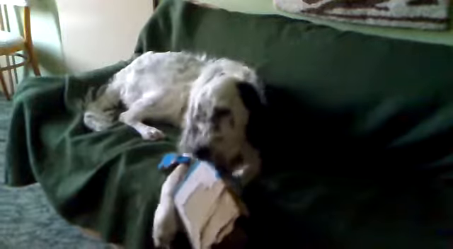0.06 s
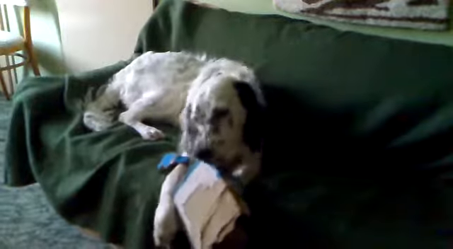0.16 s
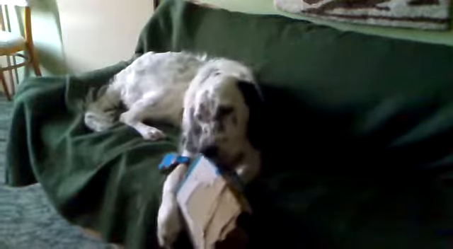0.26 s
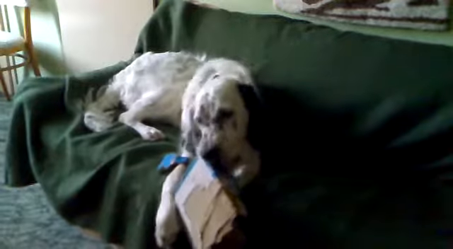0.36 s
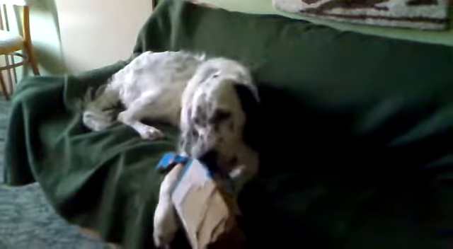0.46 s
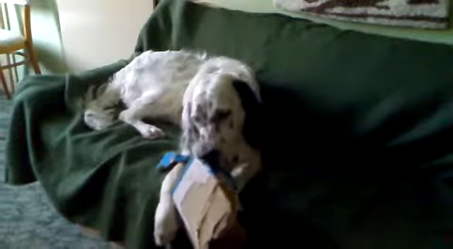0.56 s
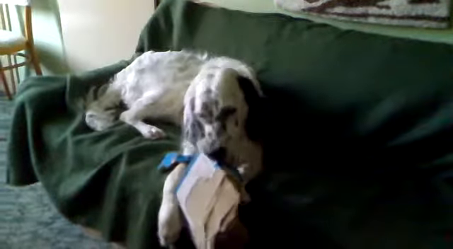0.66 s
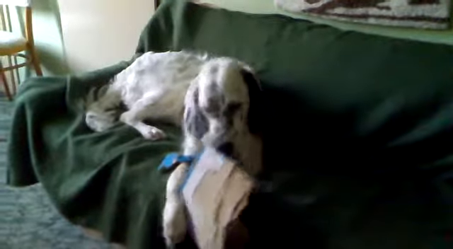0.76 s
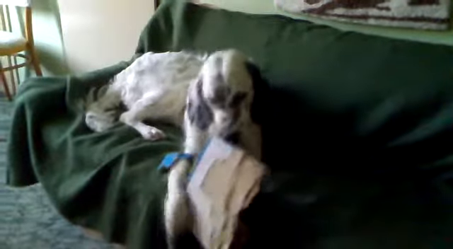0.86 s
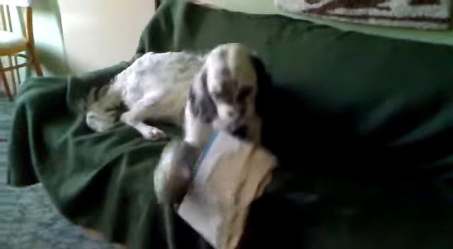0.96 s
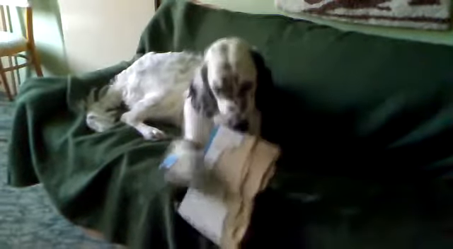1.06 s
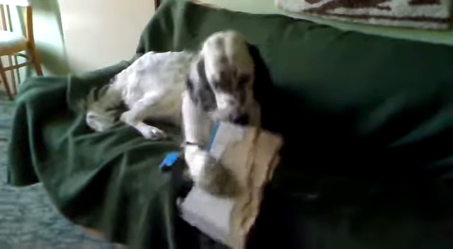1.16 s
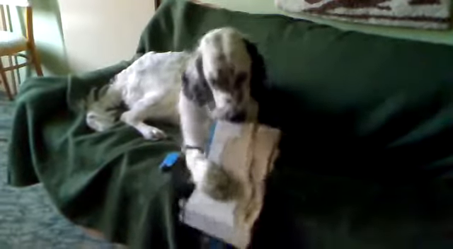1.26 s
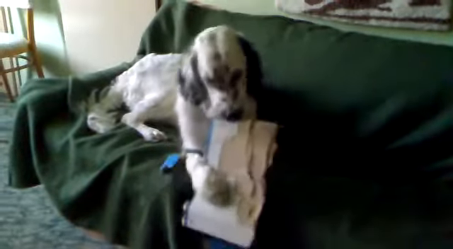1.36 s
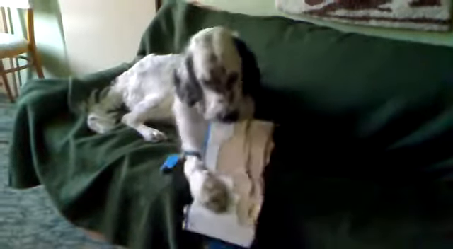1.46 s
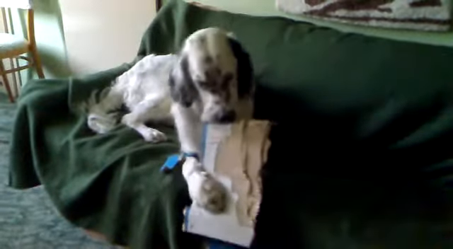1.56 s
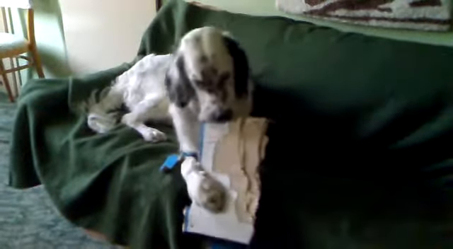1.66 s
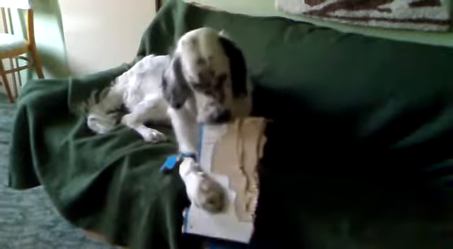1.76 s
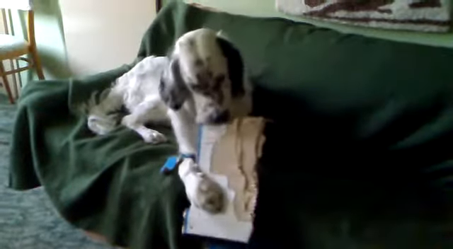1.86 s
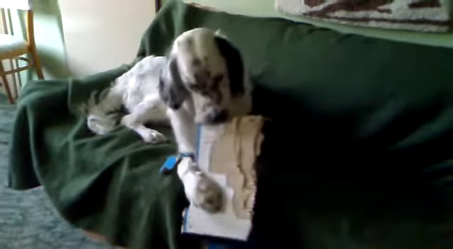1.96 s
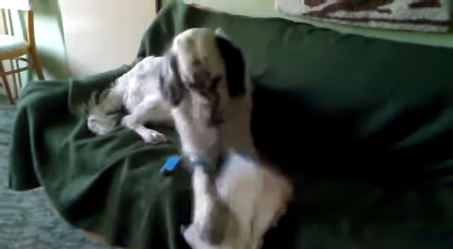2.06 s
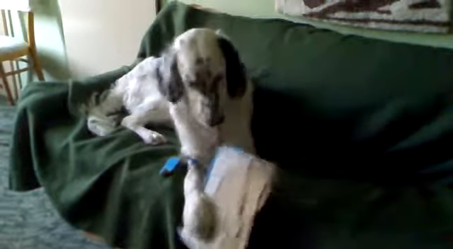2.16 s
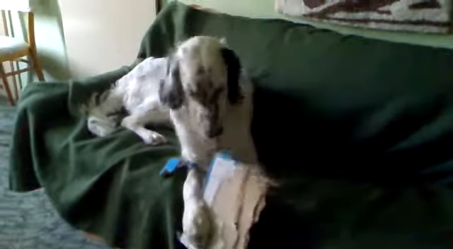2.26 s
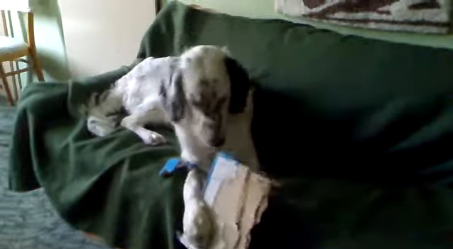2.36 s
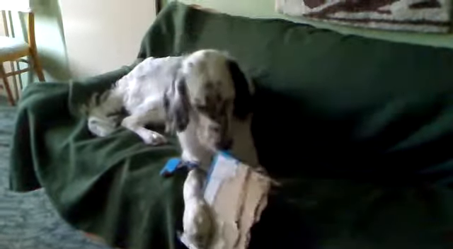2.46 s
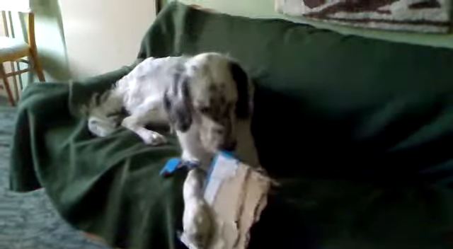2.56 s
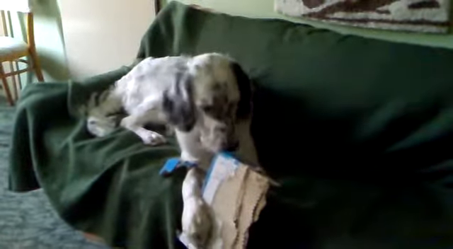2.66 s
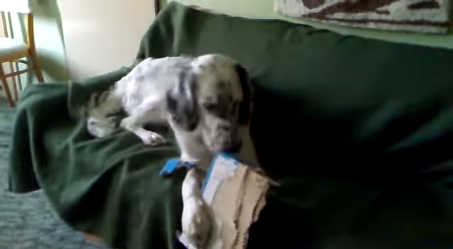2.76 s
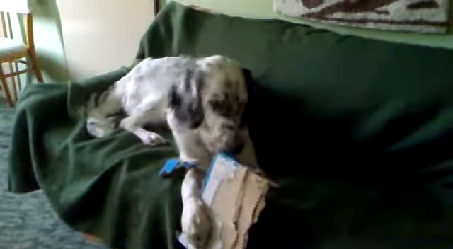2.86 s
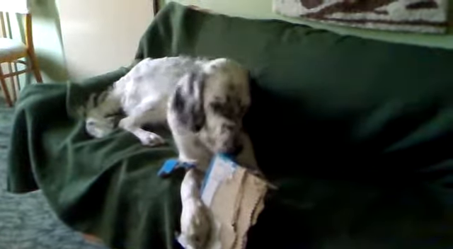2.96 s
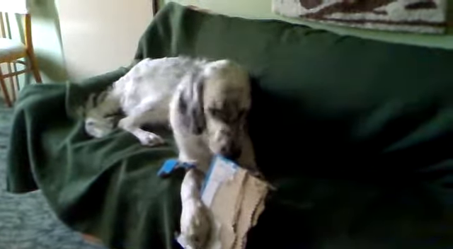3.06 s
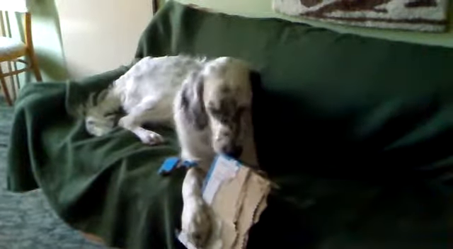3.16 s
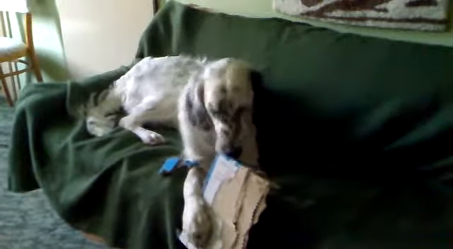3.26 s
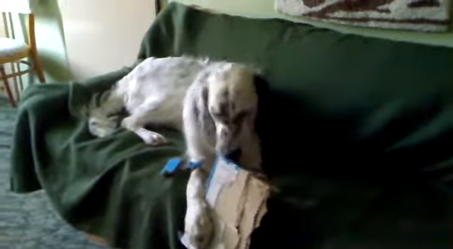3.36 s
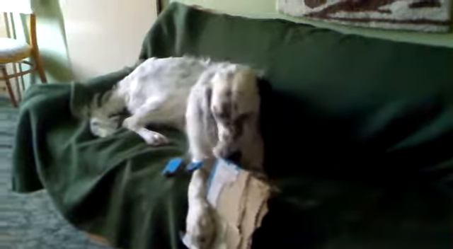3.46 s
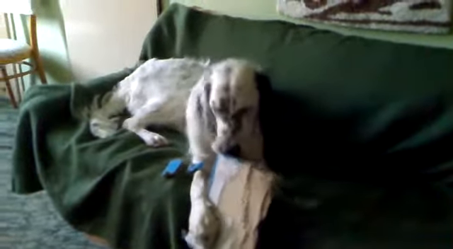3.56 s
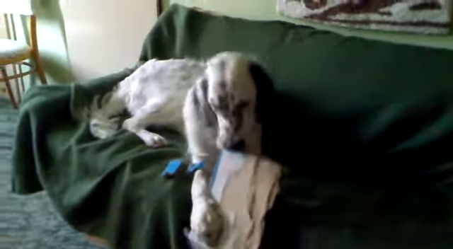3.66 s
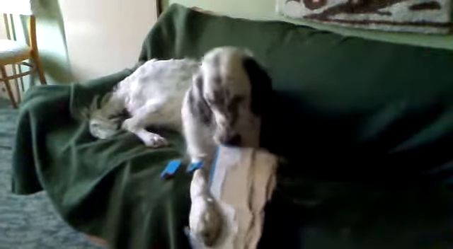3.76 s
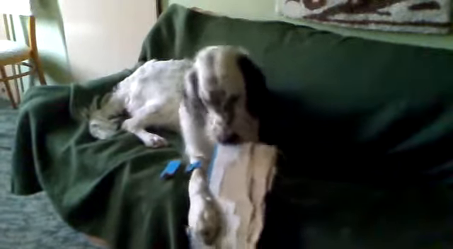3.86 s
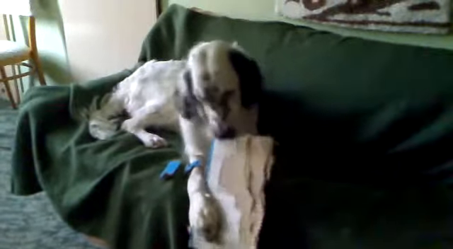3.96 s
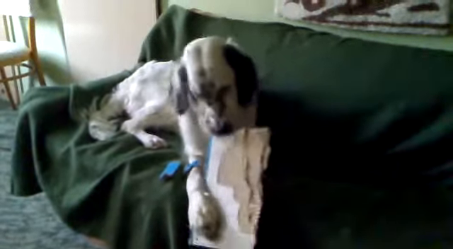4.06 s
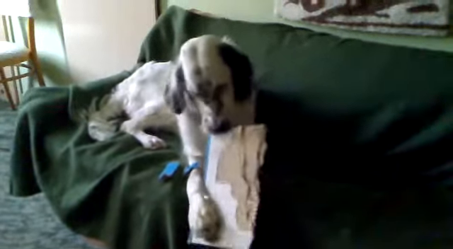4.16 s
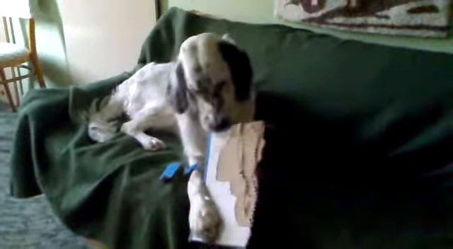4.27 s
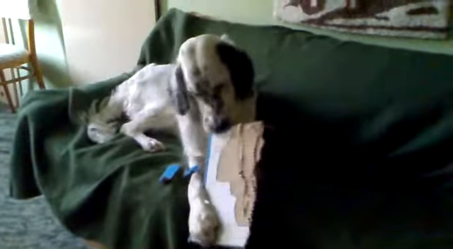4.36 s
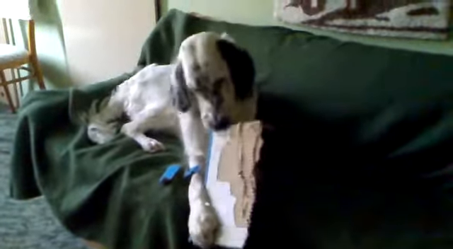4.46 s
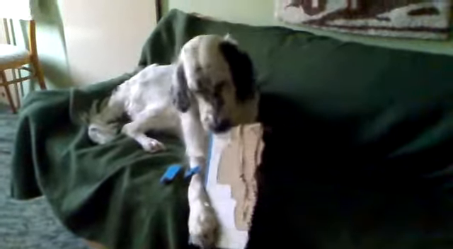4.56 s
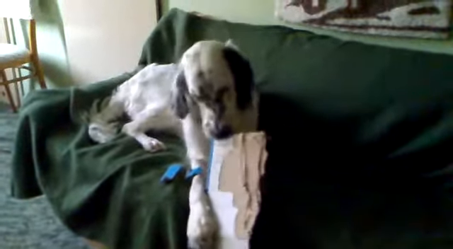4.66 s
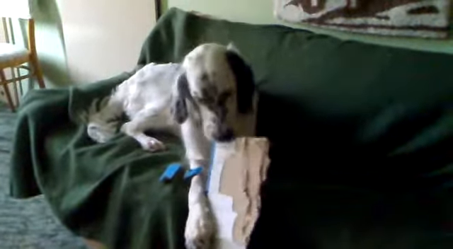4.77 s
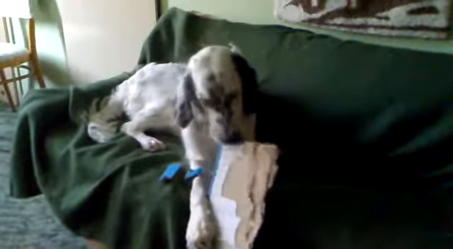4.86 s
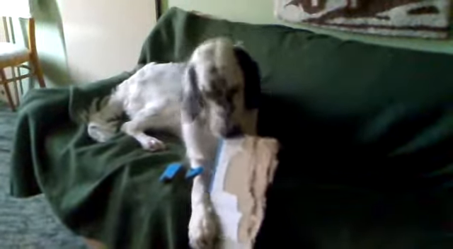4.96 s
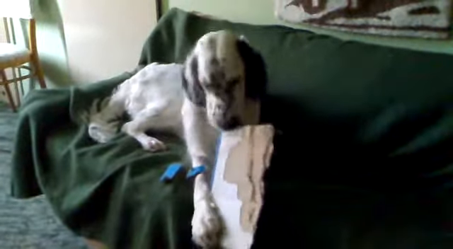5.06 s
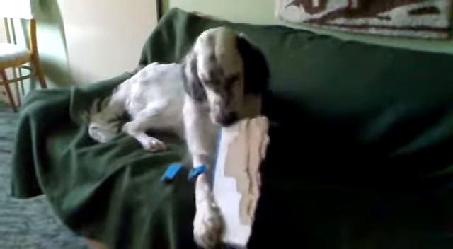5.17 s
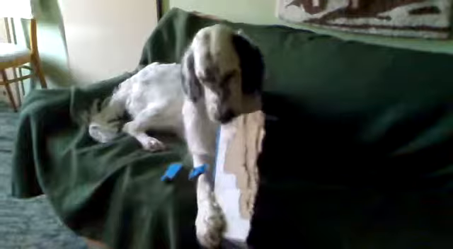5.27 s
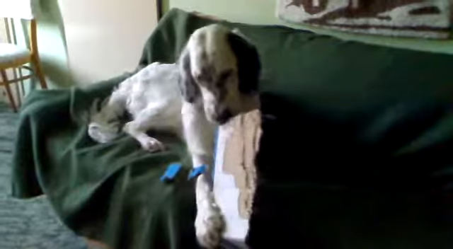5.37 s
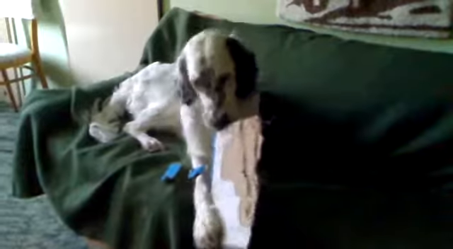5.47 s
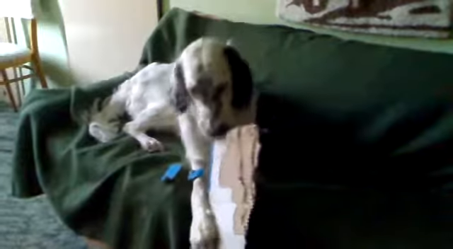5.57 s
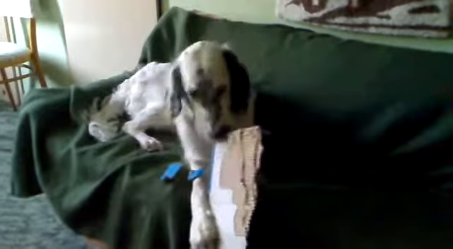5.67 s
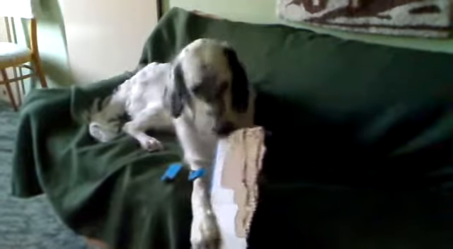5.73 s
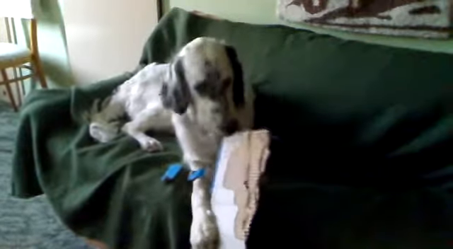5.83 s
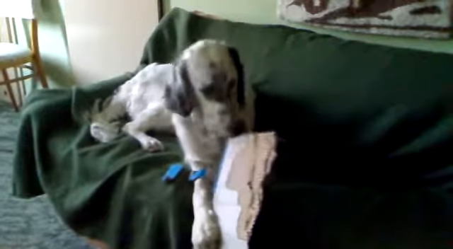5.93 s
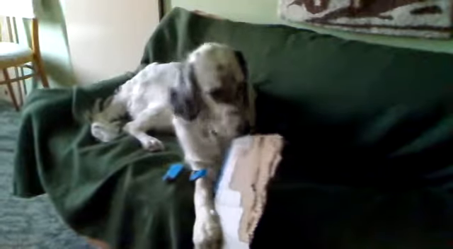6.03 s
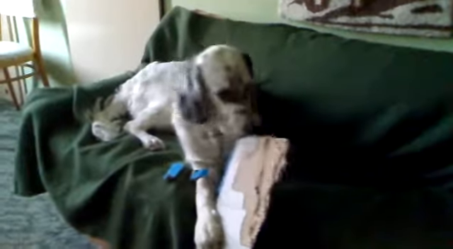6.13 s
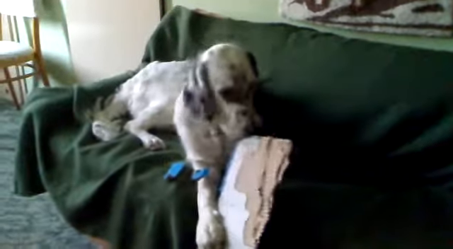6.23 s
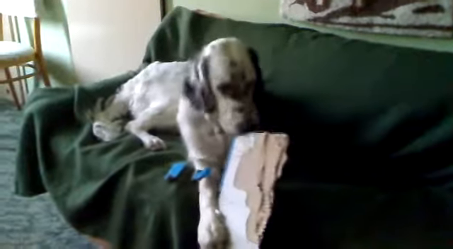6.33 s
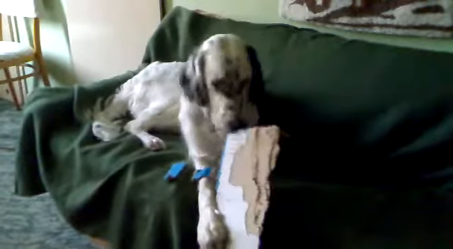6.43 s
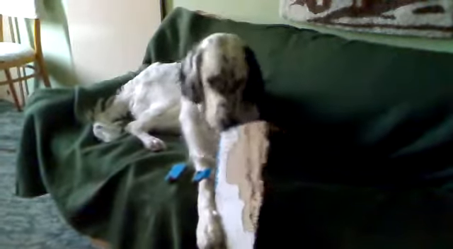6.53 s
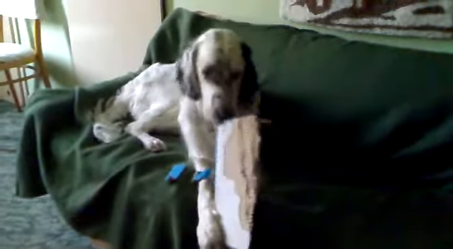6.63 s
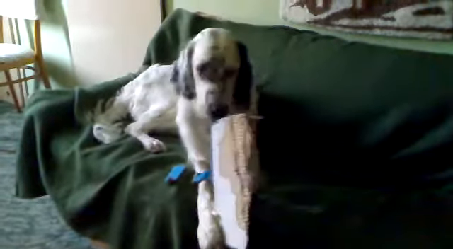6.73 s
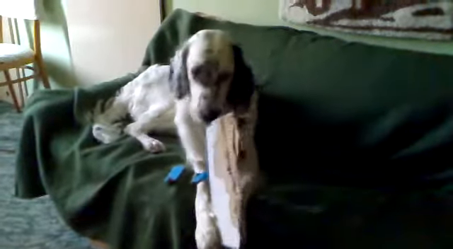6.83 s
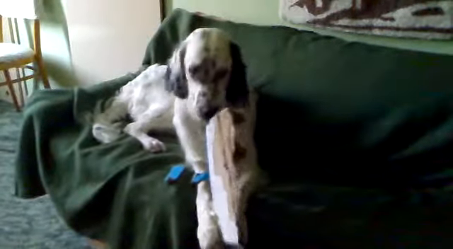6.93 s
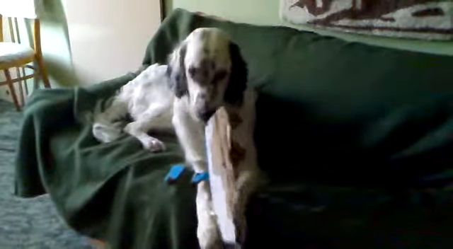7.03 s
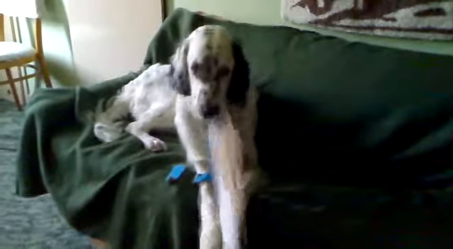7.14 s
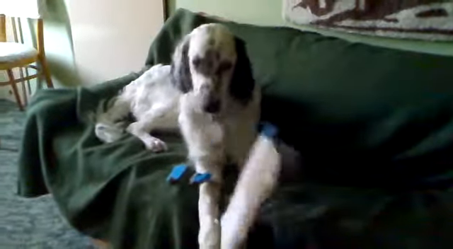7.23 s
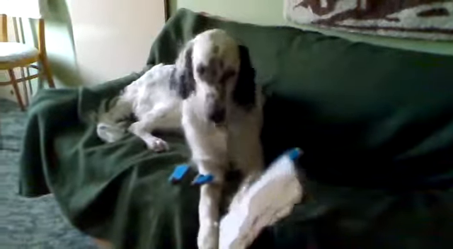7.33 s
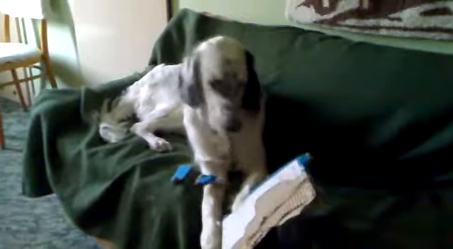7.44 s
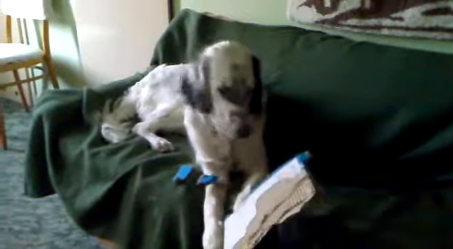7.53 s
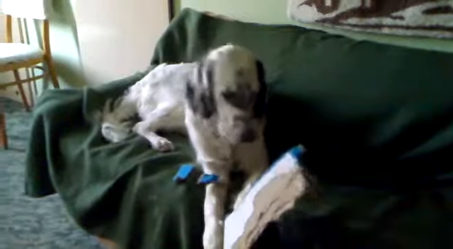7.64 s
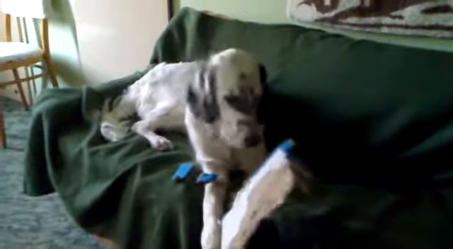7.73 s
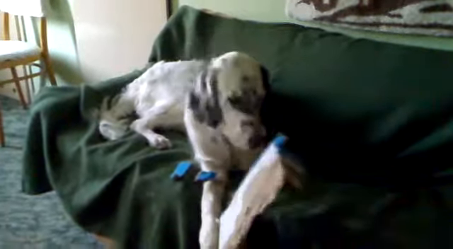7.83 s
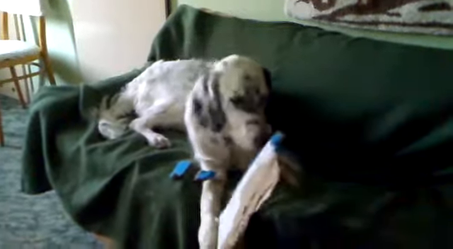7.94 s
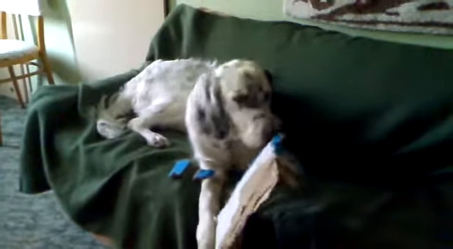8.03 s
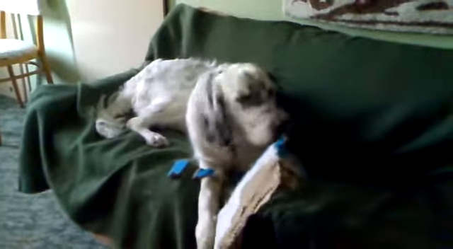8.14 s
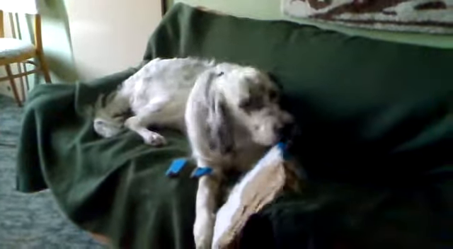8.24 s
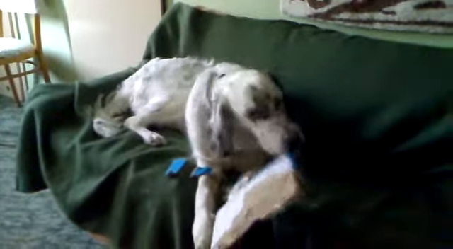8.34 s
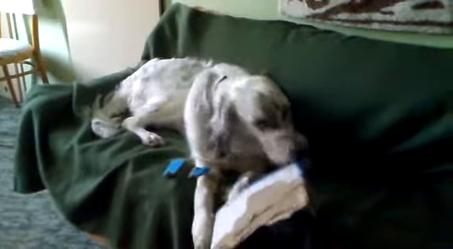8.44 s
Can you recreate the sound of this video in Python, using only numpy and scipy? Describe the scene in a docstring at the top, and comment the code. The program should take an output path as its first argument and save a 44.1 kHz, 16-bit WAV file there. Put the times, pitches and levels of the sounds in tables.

```python
"""Dog chewing a cardboard box

A dog on a sofa grips, rips and chews a flat cardboard box, a few steps away in a soft room.
Clumps of tiny cracks make the rips and light taps, sharp blows with a shiver the snaps: all ring the board.
Short, unsteady tones make the box's hollow thuds and a few higher rings of the panel.
Fading noise makes the room's answer; shaped noise makes the rumble and hiss underneath,
and steady high tones make a thin electric whine."""
import sys
import numpy as np
from scipy import signal
from scipy.fft import rfft, irfft, next_fast_len
from scipy.io import wavfile
from scipy.ndimage import map_coordinates

SR = 44100
rng = np.random.default_rng(int(sys.argv[2]) if len(sys.argv) > 2 else 0)


def generate_wav(signal):
    """Clip the signal to [-1, 1] and save it as 16-bit WAV at the path in sys.argv[1]."""
    frames = np.transpose(np.atleast_2d(signal))
    scaled = np.clip(frames, -1, 1) * 32767
    pcm = np.round(scaled).astype(np.int16)
    wavfile.write(sys.argv[1], SR, pcm)


N = 374850
T = np.arange(N) / SR  # time of every sample in seconds


def amp(db):
    """Gain of a level in dB."""
    return 10 ** (np.asarray(db) / 20)


def unit(x):
    """The sound x brought to an average (rms) strength of 1."""
    return x / np.sqrt(np.mean(x ** 2) + 1e-20)


def along(points, hz):
    """Read a curve of (Hz, value) points, spaced by pitch, at the frequencies hz."""
    f, v = np.transpose(points)
    return np.interp(np.log(hz + 1), np.log(f + 1), v)


def curves(rows):
    """Join the rows by straight lines: one value per sample for each column after the time."""
    s, *cols = np.transpose(rows)
    return [np.interp(T, s, c) for c in cols]


def wobble(rate):
    """A smooth random curve with this many random points a second."""
    return map_coordinates(rng.standard_normal(int(N * rate / SR) + 4), [T * rate])


def filtered(x, response):
    """Change the strength of each frequency in x by response(Hz)."""
    m = next_fast_len(N + SR // 2)
    return irfft(rfft(x, m) * response(np.fft.rfftfreq(m, 1 / SR)), m)[..., :N]


def background():
    """Lumpy rumble, smooth hiss and steady tones; the tones sag when the hiss falls below a set level."""
    # Each row: time in seconds, hiss level in dB, rumble level in dB before the jolts.
    levels = [(0.0, -63.5, -43), (0.85, -62, -46.5), (1.6, -64, -50), (2.45, -67, -55), (3.05, -71, -61),
              (3.3, -61.5, -50.5), (4.5, -54, -43), (4.75, -67, -51.5), (5.4, -72, -65.5),
              (6.1, -71, -60.5), (6.46, -60, -46), (7.1, -56.5, -52), (7.6, -63.5, -50.5), (8.5, -62, -49)]
    # Tone colour of the hiss. Each row: frequency in Hz, relative strength in dB per Hz.
    hiss_colour = [(180, -27), (300, -9.5), (733, -8.5), (836, -14.5), (1040, -15), (2990, -19.5),
                   (8750, -23.5), (14600, -22.5), (15600, -22)]
    # Tone colour of the rumble. Each row: frequency in Hz, relative strength in dB per Hz.
    rumble_colour = [(12, -39), (20, -7.5), (37, 7.5), (76, -3), (129, -2), (426, -14.5), (634, -22),
                     (900, -41.5), (1170, -59), (1980, -120)]
    # The dog's weight jolts the sofa. Each row: start in seconds, level in dB before the soft rise.
    jolts = [(2.19, -32.5), (3.265, -52.5), (4.62, -44), (5.455, -52.5), (7.3, -43), (8.099, -44.5)]
    # Whine, from the lowest tone up. Each entry: level of one tone in dB before any sag.
    whine_db = [-82, -83, -78, -82, -79, -92, -83, -80, -92, -79, -81, -75, -82, -76, -80, -79]
    jolt_rise_s, jolt_t60_s = 0.014, 0.68  # t60: time to fade by 60 dB
    whine_hz, whine_first = 326.85, 32  # spacing of the tones, multiple of the lowest
    sag_below_db = -62  # hiss level under which the whine sags

    hiss_db, rumble_db = curves(levels)
    rumble_gain = amp(rumble_db)
    for s, db in jolts:
        t = np.maximum(T - s, 0)
        rise = 1 - np.exp(-t / jolt_rise_s)
        rumble_gain = rumble_gain + amp(db - 60 * t / jolt_t60_s) * rise
    lumps = amp(3.6 * wobble(12))
    hiss = unit(filtered(rng.standard_normal(N), lambda hz: amp(along(hiss_colour, hz))))
    low_noise = filtered(rng.standard_normal(N), lambda hz: amp(along(rumble_colour, hz)))
    rumble = unit(lumps * low_noise)
    whine = sum(amp(db) * np.cos(2 * np.pi * (whine_first + k) * whine_hz * T)
                for k, db in enumerate(whine_db))
    sag = amp(np.minimum(hiss_db - sag_below_db, 0))
    return amp(hiss_db) * hiss + rumble_gain * rumble + sag * whine


def cracking(rate, spread_db):
    """Tiny cracks of uneven size at random moments, about rate of them a second."""
    size = amp(spread_db * np.minimum(rng.exponential(size=N), 3))
    happens = rng.random(N) < rate / SR
    direction = np.sign(rng.standard_normal(N))
    return unit(happens * size * direction)


def crackle(clumps, cracks, smooth):
    """Cracks that come in clumps, over a smooth rub."""
    return unit(clumps * (cracks + smooth * rng.standard_normal(N)))


def tearing():
    """The slow pull, rips and light taps push on panel, flutes, fibres and glossy face as crackle."""
    # Slow pull of the jaws. Each row: time in seconds, level of the crunch in dB.
    pull = [(0.0, -59.5), (0.87, -66.5), (1.28, -40), (1.49, -43), (1.72, -55.5), (1.93, -43.5),
            (1.99, -96.5), (2.06, -47), (2.14, -52), (2.32, -36.5), (2.48, -54.5), (2.51, -69),
            (3.08, -77.5), (3.45, -63), (3.71, -55), (3.8, -41), (4.61, -37), (4.79, -42.5), (4.82, -45),
            (5.04, -59), (5.15, -49.5), (5.37, -54.5), (5.52, -53), (5.57, -88), (6.2, -72), (6.65, -70),
            (6.82, -68), (7.34, -52.5), (7.55, -76.5), (8.21, -66.5), (8.5, -65)]
    # Answer to the pull. Each entry: relative level in dB of panel, flutes, fibres, glossy face.
    pull_parts_db = [0, -8, -12.5, -29.5]
    # Rips and two light taps near the start (0.226 s, 0.447 s), each a short or running burst
    # of cracks. Each row: start in seconds, rough peak level in dB,
    # relative level of the fibres in dB, length in seconds (5 ms at least is used).
    bursts = [(0.226, -30, -6, 0.014), (0.447, -29.5, -17.5, 0.021), (0.6, -46, -2, 0.044),
              (0.883, -43.5, 0.5, 0.128), (0.942, -27.5, -22, 0.049), (1.082, -35, -16, 0.04),
              (1.278, -20.5, -12.5, 0.04), (1.386, -21, -10.5, 0.043), (1.386, -30.5, -1.5, 0.13),
              (1.473, -22, -7.5, 0.0655), (1.557, -22.5, -5, 0.067), (2.182, -5.5, -10.5, 0.066),
              (2.32, -45.5, -19, 0.052), (2.4, -29.5, -13, 0.065), (3.085, -56.5, -8, 0.099),
              (3.172, -47.5, -7.5, 0.087), (3.33, -47, -12, 0.08), (3.49, -45, -15, 0.032),
              (3.563, -38.5, -23, 0.062), (3.783, -22.5, -8, 0.068), (3.916, -26.5, -9, 0.045),
              (4.066, -39, -3, 0.1), (4.319, -17, -9.5, 0.03), (4.515, -34, 0, 0.032),
              (4.597, -17.5, 5.5, 0.029), (5.201, -32.5, -41.5, 0.031), (5.227, -36, 3, 0.081),
              (5.362, -30.5, -9.5, 0.084), (5.61, -50.5, 0.5, 0.054), (5.701, -49, -15, 0.035),
              (6.261, -41.5, -9.5, 0.13), (6.575, -33, -22.5, 0.11), (6.644, -24, -10, 0.042),
              (6.739, -30.5, -10.5, 0.067), (6.804, -36, 0.5, 0.073), (6.909, -30.5, 1.5, 0.061),
              (7.086, -29.5, 1, 0.084), (7.295, -15.5, -4, 0.047), (7.331, -20.5, -11, 0.046),
              (7.374, -28, -14, 0.11), (7.769, -46, -18, 0.06), (7.886, -49.5, -29, 0.085),
              (8.09, -44, -38, 0.04), (8.242, -46.5, -3, 0.14), (8.35, -40, -1, 0.018),
              (8.416, -30, -14, 0.057)]
    crest_db = 8  # peaks stand about this far above the running crackle
    flute_db, flute_follows = 3.7, 0.82  # brighter bursts ring the flutes more, up to a limit
    sheen_db, sheen_follows = -17, 0.46  # and split the gloss more

    pull_db, = curves(pull)
    power = amp([db + pull_db for db in pull_parts_db]) ** 2
    t = T[:SR // 2]
    catch = np.array([[.12], [.14], [.28], [.4]])  # share of the length; the treble comes up later
    for s, db, fibre, length in bursts:
        # a burst comes up quickly, runs, and dies away; in a rip the strip then comes free
        u = t / max(length, .005)
        shape = (1 - np.exp(-u / catch)) ** 2 * np.exp(-u ** 2.45)
        flute = flute_db + flute_follows * min(fibre, -6)
        sheen = sheen_db + sheen_follows * fibre
        parts_db = np.array([[0], [flute], [fibre], [sheen]])
        burst = amp(db - crest_db + parts_db) * shape
        start = round(s * SR)
        power[:, start:start + len(t)] += burst[:, :N - start] ** 2
    clumps = amp(1.6 * wobble(18) + 2.2 * wobble(70))
    # a big crack jars every part at once
    big, fine = cracking(260, spread_db=3), cracking(1800, spread_db=3)
    cracks = [crackle(clumps, big, smooth=.6),
              crackle(clumps, big, smooth=.6),
              crackle(clumps, .6 * big + .8 * fine, smooth=.7),
              crackle(clumps, .4 * big + fine, smooth=.8)]
    return np.sqrt(power) * cracks


def snapping():
    """One blow, a short splinter, then the sheet keeps shivering; the thin edge quietens first."""
    # Snaps. Each row: start in seconds, level in dB before the blow and shiver are shaped,
    # then the levels of flutes, fibres and gloss in dB relative to the panel.
    snaps = [(0.571, -35.5, 8, 11.5, -8.5), (1.151, -34, -0.5, 6, -26), (1.187, -20.5, -4.5, -12.5, -40),
             (1.271, -18.5, -3.5, -11.5, -39.5), (1.319, -16.5, 0, -10, -36.5),
             (1.378, -20, -19, -14.5, -38), (1.497, -17.5, -20, -17.5, -37),
             (1.513, -18, -16, -20.5, -40.5), (1.59, -14.5, -8, -7, -35), (1.6, -11, -12, -17.5, -39.5),
             (1.8, -27.5, -6.5, -1, -38), (1.912, -32, -22, -25.5, -45.5), (2.011, -33, -4, -10, -31.5),
             (2.149, -28.5, -8.5, -15, -34.5), (2.174, -13, -16.5, -15.5, -24),
             (2.195, -9.5, -8.5, -6.5, -30.5), (2.305, -16, -4.5, -2, -5), (2.808, -40, -11, -30, -30),
             (3.74, -23.5, -8.5, -5.5, -34.5), (3.792, -23, -6.5, -12, -30.5), (3.905, -24.5, -7, 3, -7),
             (4.199, -22.5, -5, 8, -21.5), (4.257, -16.5, -9, -17, -46.5), (4.315, -17, -14.5, -25, -51),
             (4.369, -16, 0.5, 6, -7.5), (4.427, -9, -11.5, -25, -44), (4.495, -12, -11.5, -44.5, -45),
             (4.624, -2.5, 0.5, -36, -35.5), (5.047, -26, -12, -11, -39), (5.293, -10, -1, -18.5, -35.5),
             (5.302, -12.5, -15, -20, -39), (5.423, -23.5, -27, -31.5, -43), (5.748, -39, -2, -2.5, -32.5),
             (5.952, -52, -2.5, -3, -16.5), (6.991, -18.5, -6.5, -12, -36), (7.43, -30.5, 4.5, 1, -12.5),
             (7.72, -45, -5.5, -6, 5)]
    t60_s, t60_grows = 0.32, 0.14  # shiver's base fading time; hard snaps shiver longer (dB per dB)
    shiver_grows = 0.16  # dB per dB: hard snaps shake the whole sheet, light ones stay dry ticks
    shiver_ref_db = -8  # snap level at which neither growth changes anything

    force, t = np.zeros((4, N + SR)), T[:SR // 4]
    life = t60_s * np.array([[1.0], [.85], [.6], [.45]])
    for s, db, flute, fibre, gloss in snaps:
        hardness_db = db - shiver_ref_db
        splinter = 0.032 * amp(-60 * t / 0.014)
        shiver = 0.23 * amp(-60 * t / (life * amp(t60_grows * hardness_db)))
        shock = (splinter + shiver) * rng.standard_normal((4, len(t)))
        # the shiver rattles: a new random level every 120 samples
        rattle = np.repeat(rng.standard_normal(len(t) // 120 + 1), 120)[:len(t)]
        shock *= amp(4 * rattle - 3)
        shock *= amp(shiver_grows * hardness_db)
        shock[2:] *= 1 - np.exp(-t / 0.002)  # fibres part one after another
        shock[:, 0] = [6, 3.5, 1.2, .3]  # the blow itself
        start = round(s * SR)
        parts_db = np.array([[0], [flute], [fibre], [gloss]])
        force[:, start:start + len(t)] += amp(db + parts_db) * shock
    return force[:, :N]


def resonate(x, modes, free_db, flex_db):
    """Pass x through steep resonances; their strengths wander as the board flexes."""
    m = next_fast_len(N + SR // 8)
    f = np.fft.rfftfreq(m, 1 / SR)
    each = []
    for k, (c, w, db) in enumerate(modes):
        one_pass = 1j * f * w / (c * c - f * f + 1j * f * w)
        each.append((-1) ** k * amp(db) * one_pass ** 2)  # neighbours get opposite signs
    each = np.array(each)
    strength = np.sqrt(np.mean(np.abs(each.sum(0)) ** 2))
    rings = irfft(rfft(x, m) * each / strength, m)[:, :N]
    return sum(amp(db + flex_db * wobble(9)) * ring for db, ring in zip(free_db, rings))


def cardboard():
    """Tearing and snapping ring the same four parts of the board, each at its own pitches."""
    # Each row of these four: pitch in Hz, width of one filter pass in Hz, relative level in dB.
    panel_modes = [(228, 180, -6), (444, 180, -5.5), (555, 170, -0.5), (761, 302, -1), (976, 280, -4.5),
                   (1143, 270, -1.5), (1427, 290, -7.5)]  # flat board
    flute_modes = [(1605, 320, 2), (1823, 230, 7), (2083, 1050, -1)]  # corrugation
    fibre_modes = [(3540, 2070, 2.5), (4485, 1100, 1.5), (5920, 2240, -1)]  # tearing edge
    sheen_modes = [(11300, 8300, 0)]  # splitting of the glossy face
    # Where jaws and paw hold the board decides which panel mode is free to ring.
    # Each row: time in seconds, favoured pitch in Hz.
    grip = [(0.0, 726), (0.95, 547), (1.24, 600), (1.27, 1290), (1.46, 1260), (1.52, 1110), (1.72, 1040),
            (1.8, 657), (2.8, 1212), (3.7, 806), (4.45, 840), (4.5, 563), (4.62, 750), (4.95, 870),
            (5.05, 493), (5.2, 830), (5.3, 596), (5.47, 573), (5.52, 1140), (5.9, 878), (6.6, 633),
            (7.35, 678), (7.95, 928), (8.5, 800)]
    grip_db, grip_octaves = 5.5, 0.28  # gap between free and held modes, reach of the lift

    panel, flute, fibre, sheen = tearing() + snapping()
    grip_hz, = curves(grip)
    free_db = []
    for hz, _, _ in panel_modes:
        octaves_away = np.log2(hz / grip_hz)
        free_db.append(grip_db * (np.exp(-(octaves_away / grip_octaves) ** 2) - .5))
    low = resonate(panel, panel_modes, free_db, flex_db=1.8)
    low = low + resonate(flute, flute_modes, [0] * 3, flex_db=2.5)
    high = resonate(fibre, fibre_modes, [0] * 3, flex_db=3.5)
    return low + high + resonate(sheen, sheen_modes, [0], flex_db=6.5)


def thuds_and_rings():
    """The hollow box booms and its panel rings: fading tones with a soft start and unsteady pitch."""
    # Hollow thuds of the box and a few higher rings of the panel.
    # Each row: start in seconds, level in dB before the soft start, pitch in Hz before drift,
    # time to fade by 60 dB in seconds (20 ms at least is used).
    hits = [(0.11, -40.5, 432.5, 0.84), (0.236, -15.5, 231.6, 0.059), (0.461, -20.5, 256.6, 0.0525),
            (1.492, -21.5, 239, 0.21), (1.598, -19, 244.2, 0.14), (2.206, -20.5, 363, 0.28),
            (2.268, -1.5, 249.6, 0.031), (3.566, -37, 235.6, 0.25), (4.256, -17, 272.5, 0.076),
            (4.428, -5.5, 263.7, 0.056), (5.05, -26.5, 303, 0.15), (5.291, -23.5, 249.5, 0.2),
            (5.42, -21, 555, 0.12), (5.507, -24, 1138, 0.045), (6.657, -11.5, 254, 0.045),
            (6.924, -31, 452.6, 0.25), (7.497, -26.5, 148, 0.177), (8.433, -20.5, 329, 0.061),
            (8.458, -19, 329, 0.114)]
    drift_step = .05  # typical random phase step in radians per sample

    out, t = np.zeros(N + SR), T[:SR // 2]
    for s, db, hz, t60 in hits:
        drift = drift_step * np.cumsum(rng.standard_normal(len(t)))
        main = np.sin(2 * np.pi * hz * t + drift)
        lower = 0.25 * np.sin(2 * np.pi * hz * rng.uniform(0.36, 0.96) * t)
        soft_start = 1 - np.exp(-t / 0.015)
        fade = amp(db - 60 * t / max(t60, .02))
        out[round(s * SR):][:len(t)] += fade * soft_start * (main + lower)
    return out[:N]


def room(x):
    """The room answers x a moment later; each frequency of the answer dies at its own speed."""
    # Each row: frequency in Hz, time to fade by 60 dB in seconds.
    fading = [(200, 0.4), (1000, 0.17), (3000, 0.17), (9000, 0.03)]
    hz, t, z = signal.stft(rng.standard_normal(SR // 2), SR, nperseg=256)
    fade = amp(-60 * t / along(fading, hz)[:, None])
    tail = signal.istft(z * fade, SR, nperseg=256)[1]
    late = np.pad(x, (200, 0))  # delay in samples
    return signal.fftconvolve(late, tail / np.linalg.norm(tail))[:N]


def scene():
    """The box, its room and the background."""
    box = cardboard() + thuds_and_rings()
    return (box + amp(-9.5) * room(box) + background())[None]


def record(dry):
    """The loudest peaks are rounded off; nothing passes above the band limit."""
    top_hz = 15680
    held = dry / (1 + np.abs(dry / .95) ** 6) ** (1 / 6)
    return filtered(held, lambda hz: hz < top_hz)


dry = scene()
out = record(dry)
generate_wav(out)
```